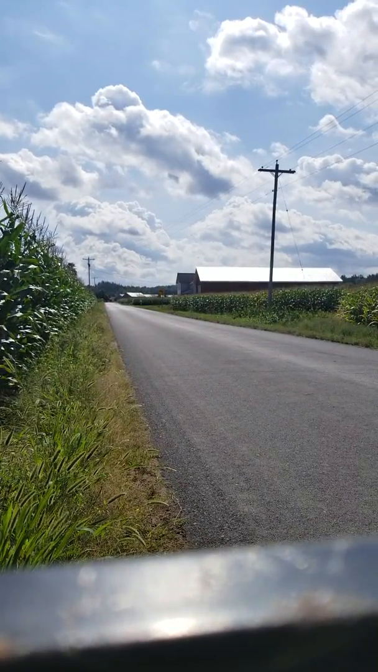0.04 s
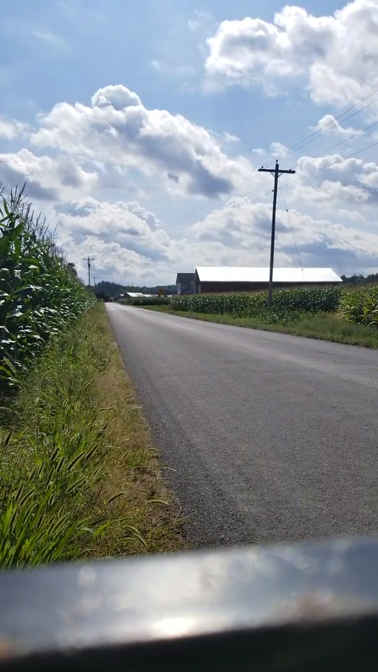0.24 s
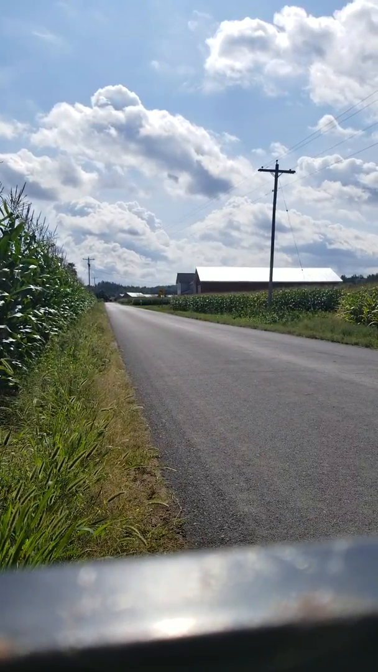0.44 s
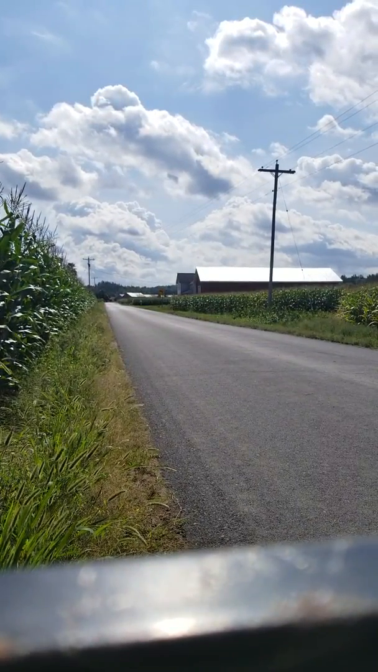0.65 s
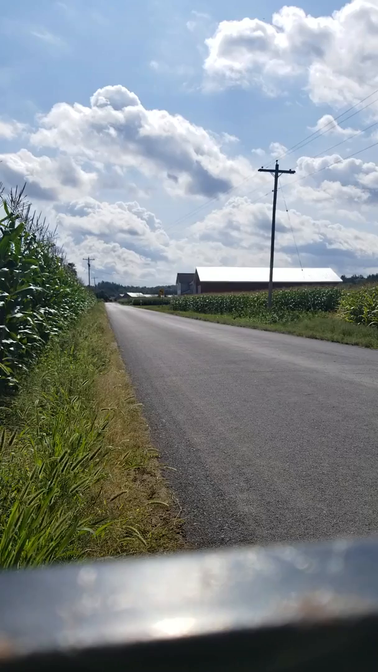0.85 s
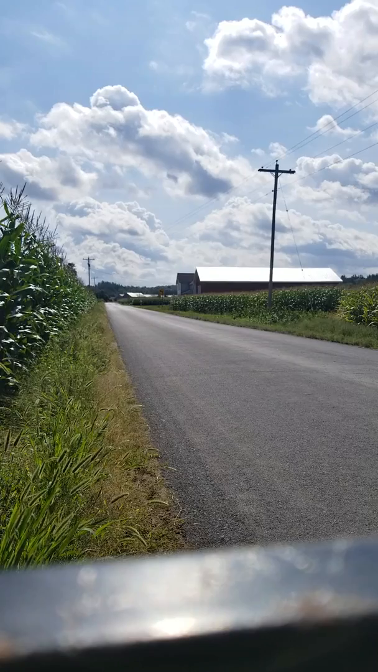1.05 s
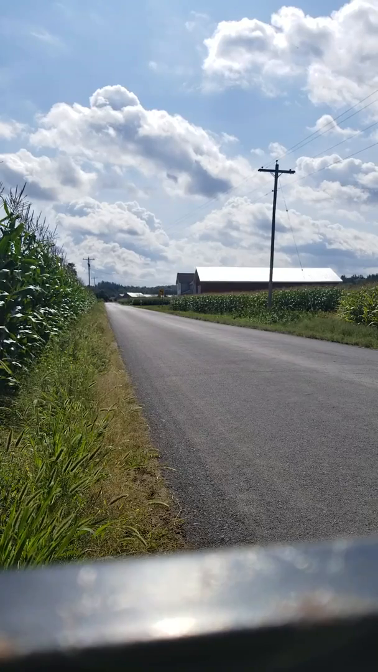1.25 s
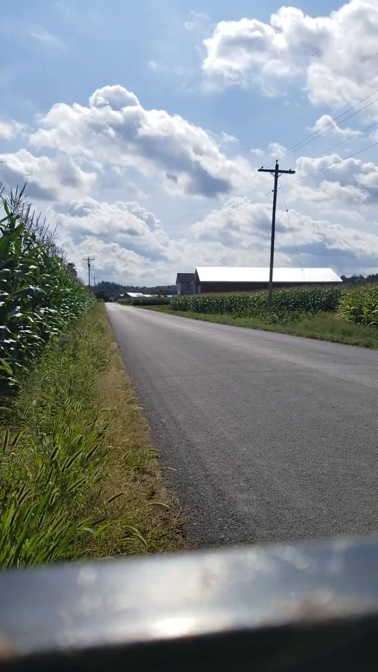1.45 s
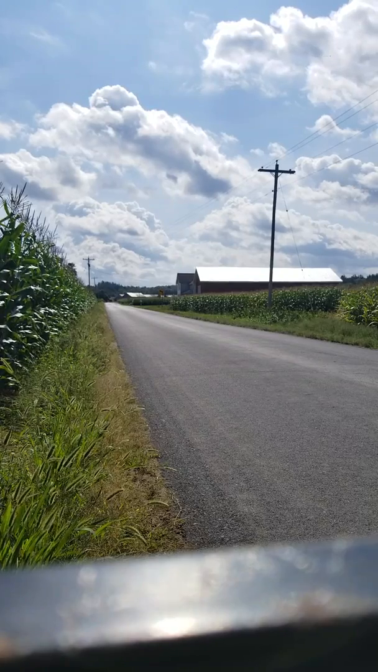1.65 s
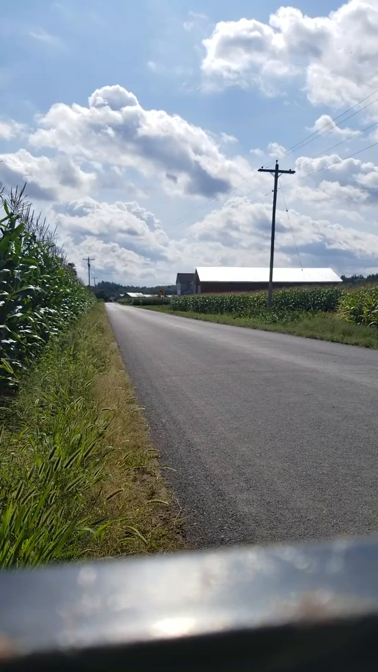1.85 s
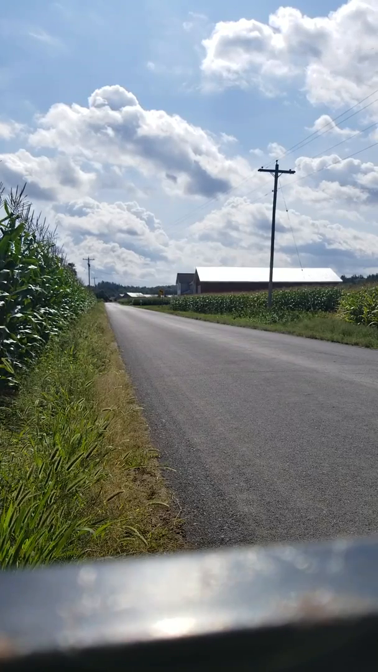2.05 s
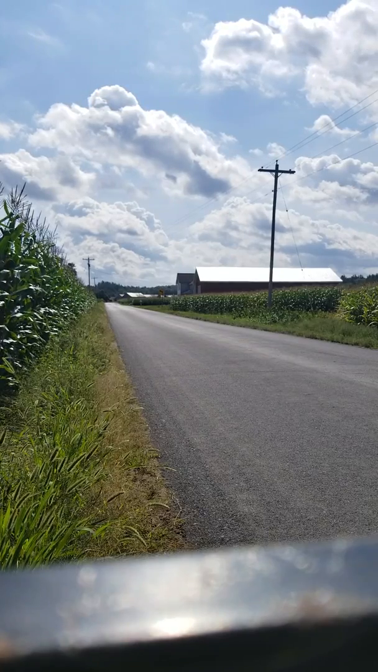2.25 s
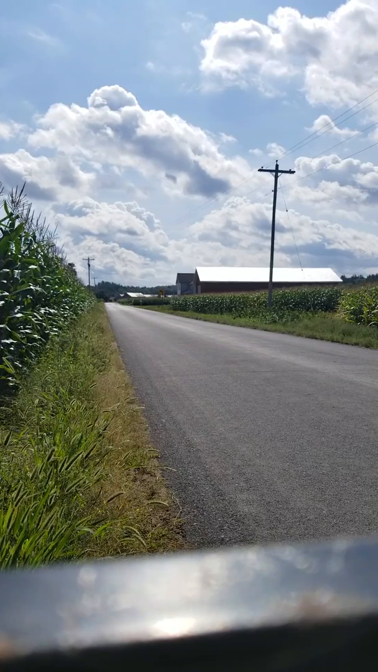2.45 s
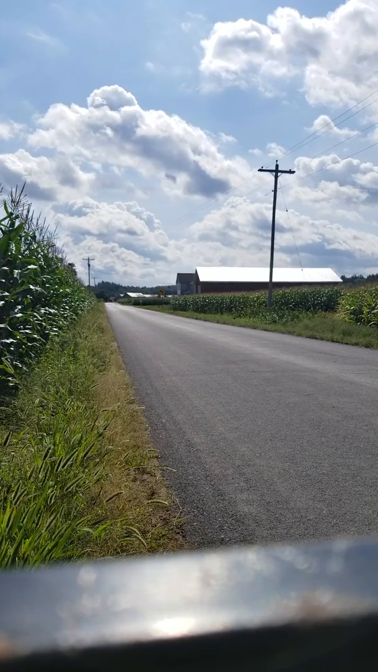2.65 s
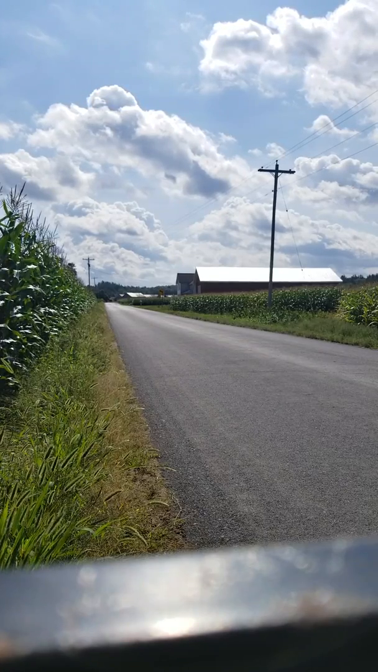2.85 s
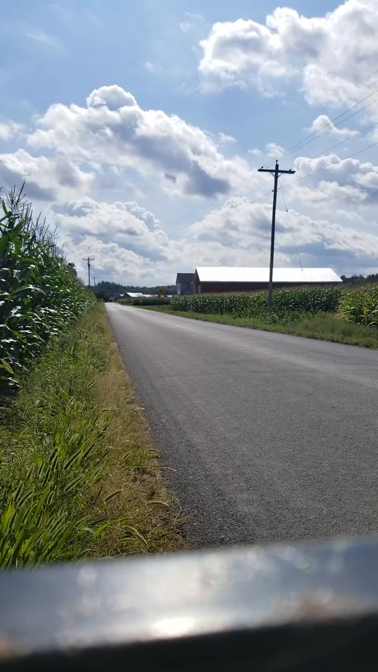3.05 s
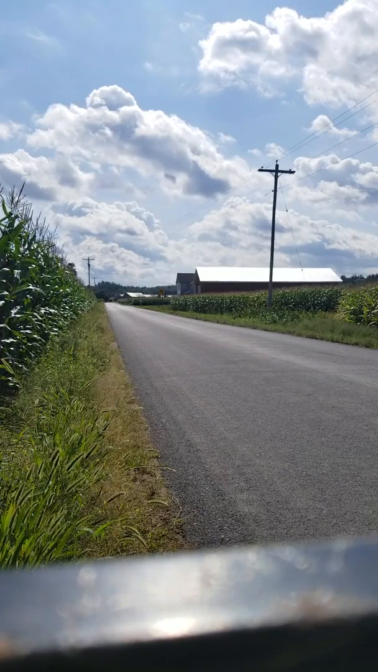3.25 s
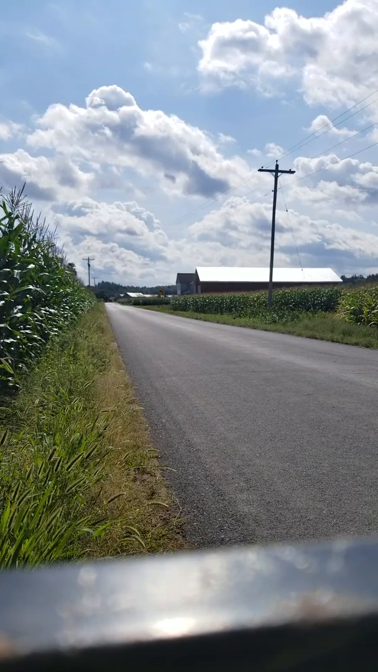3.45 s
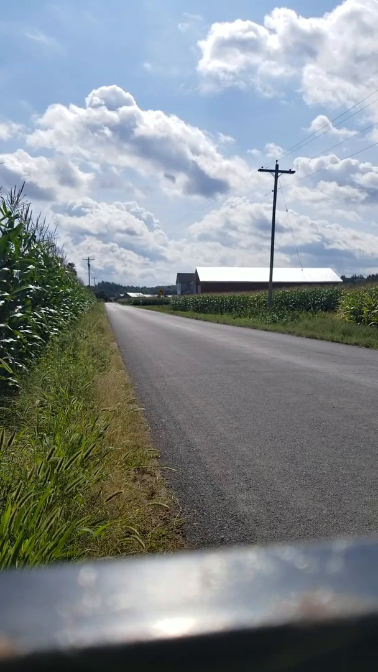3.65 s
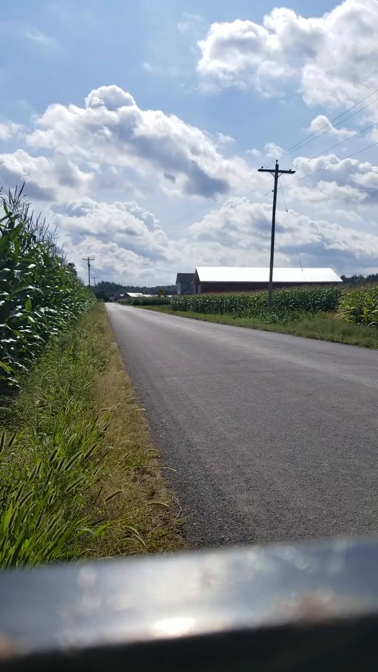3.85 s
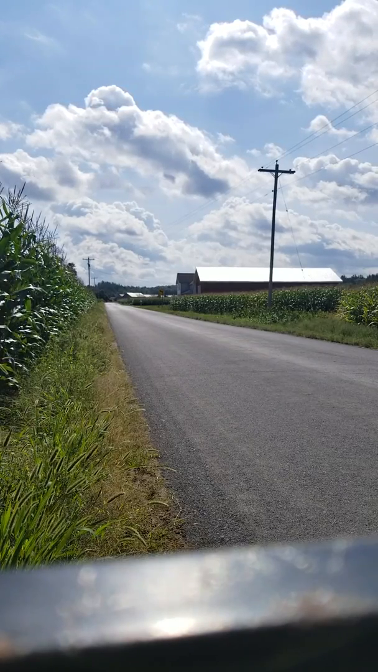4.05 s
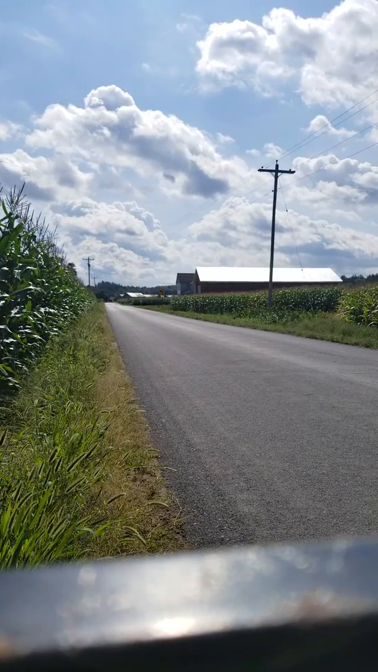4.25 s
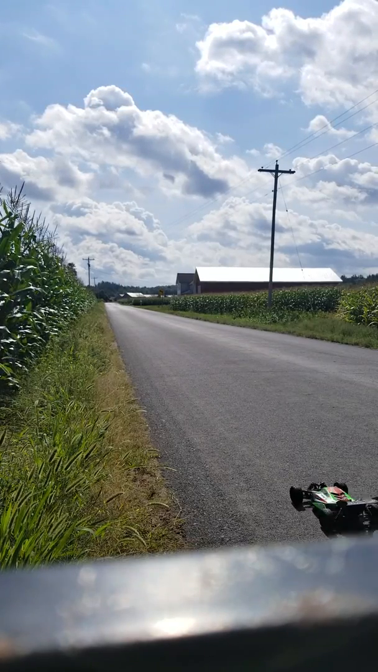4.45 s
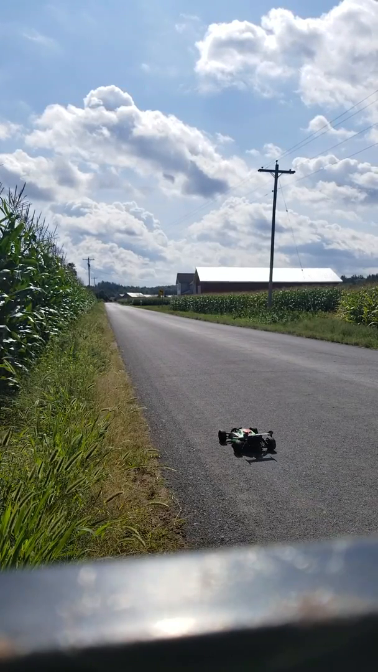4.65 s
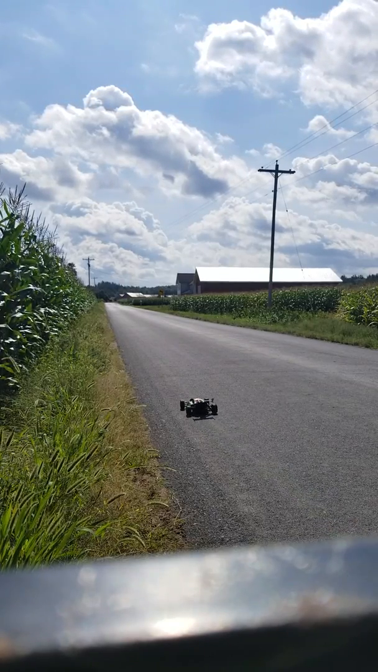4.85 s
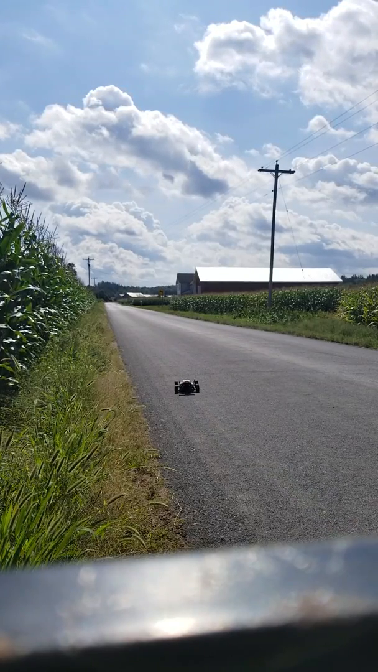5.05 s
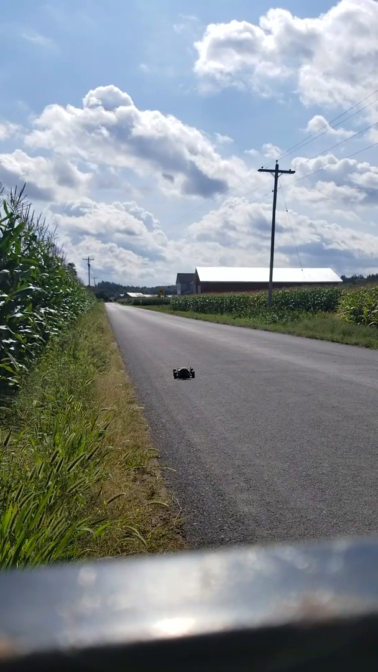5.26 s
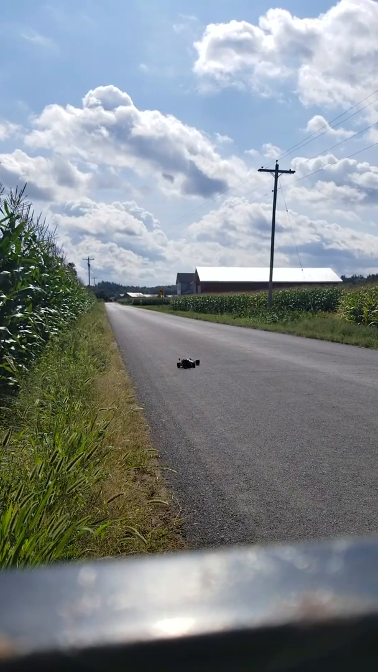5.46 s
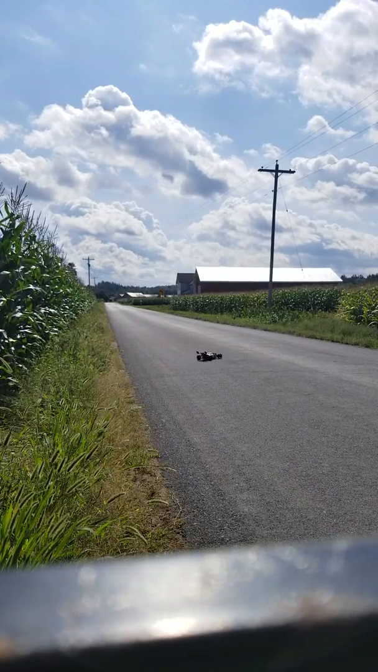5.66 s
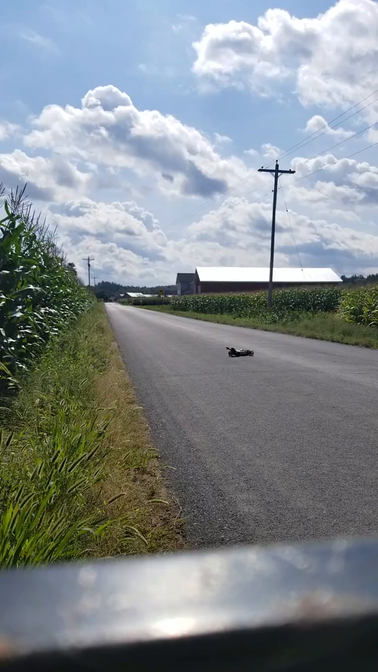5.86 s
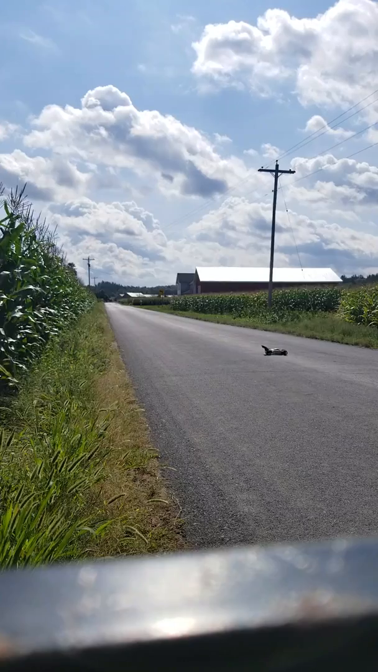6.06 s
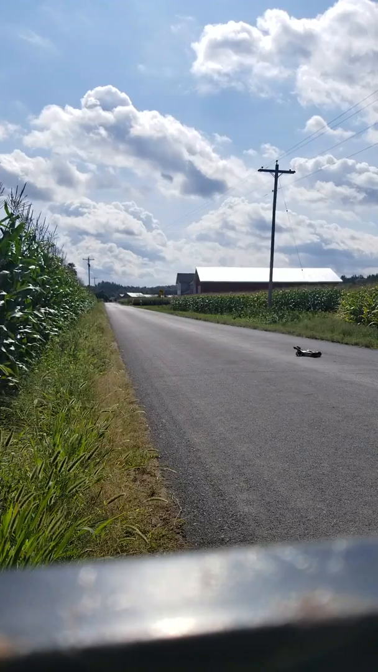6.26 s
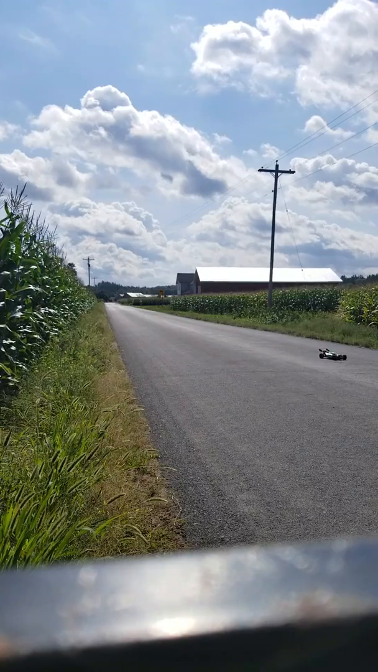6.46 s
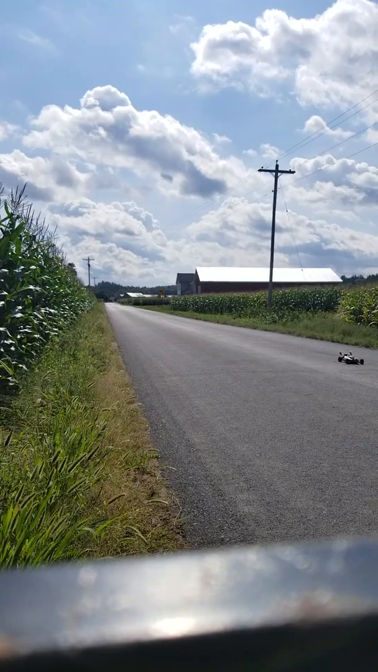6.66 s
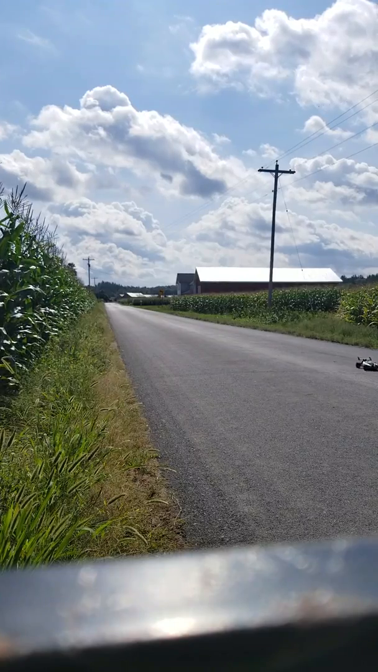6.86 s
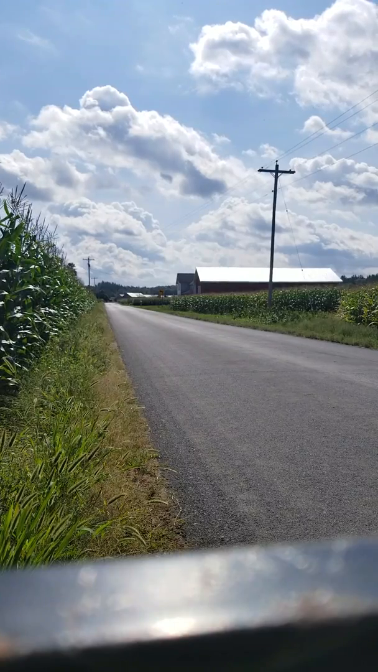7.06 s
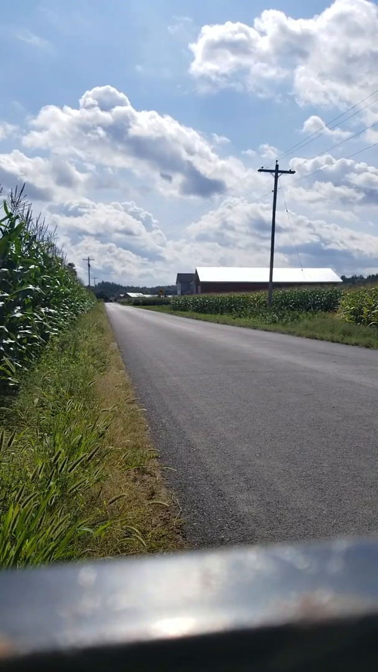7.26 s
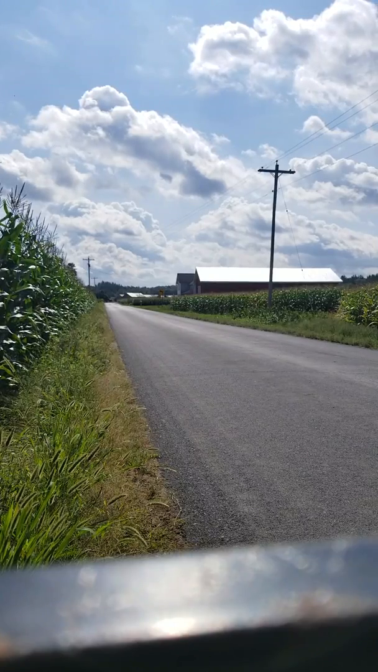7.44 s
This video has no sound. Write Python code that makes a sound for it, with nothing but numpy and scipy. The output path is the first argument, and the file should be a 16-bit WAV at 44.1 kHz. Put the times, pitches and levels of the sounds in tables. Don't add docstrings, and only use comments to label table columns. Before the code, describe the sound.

Camera fumbling over quiet maize field and insects, then a small electric model car clatters its gears, whines past, coasts and speeds up again.

```python
import sys
import numpy as np
from scipy import signal
from scipy.fft import rfft, irfft, next_fast_len
from scipy.io import wavfile
from scipy.ndimage import uniform_filter1d, map_coordinates

SR = 44100
rng = np.random.default_rng(int(sys.argv[2]) if len(sys.argv) > 2 else 0)


def materialize(psi):
    bounded = np.clip(np.atleast_2d(psi).T, -1, 1)
    quanta = np.round(bounded * 32767).astype(np.int16)
    wavfile.write(sys.argv[1], SR, quanta)


def makeup_ratio(level_db):
    decades = np.asarray(level_db, float) / 20
    return 10 ** decades


N = 330794
TIME = np.arange(N) / SR


def unit(x):
    return x / np.sqrt(np.mean(x ** 2) + 1e-20)


def along(points, hz):
    f, v = np.transpose(points)
    return np.interp(np.log(hz + 1), np.log(f + 1), v)


def curves(rows):
    s, *cols = np.transpose(rows)
    return [np.interp(TIME, s, c) for c in cols]


def wobble(rate):
    knots = rng.standard_normal(int(N * rate / SR) + 4)
    return map_coordinates(knots, [TIME * rate])


def bell(s, half_s):
    return np.exp(-((TIME - s) / half_s) ** 2)


def gate(start, end, fade):
    return np.clip(np.minimum(TIME - start, end - TIME) / fade, 0, 1)


def filtered(x, response):
    m = next_fast_len(N + 8192)
    return irfft(rfft(x, m) * response(np.fft.rfftfreq(m, 1 / SR)), m)[..., :N]


def coloured(x, colour):
    return unit(filtered(x, lambda hz: makeup_ratio(along(colour, hz))))


def patchy(depth_db, size=5):
    z = signal.stft(rng.standard_normal((2, N)), nperseg=512)[2]
    patches = uniform_filter1d(rng.standard_normal(z.shape[1:]), size, 0)
    patches = uniform_filter1d(patches, 12, 1)
    return unit(signal.istft(z * makeup_ratio(depth_db * unit(patches)), nperseg=512)[1][:, :N])


def spread(pair, alike, ports):
    turn = lambda hz: np.arccos(np.clip(along(alike, hz), -1, 1)) / 2
    mid, side = filtered(pair, lambda hz: np.array([np.cos(turn(hz)), np.sin(turn(hz))]))
    return filtered(np.array([mid + side, mid - side]), lambda hz: makeup_ratio(along(ports, hz) * [[.5], [-.5]]))


def sides(pan_db):
    return makeup_ratio(np.array([[pan_db / 2], [-pan_db / 2]]))


# (frequency [Hz], level [dB per Hz])
RUMBLE_COLOUR = [(21, -20.5), (35, -1.5), (86, 2), (146, -13.5), (308, -25), (369, -22.5), (425, -24.5),
                 (571, -28), (766, -38.5), (1000, -50), (1300, -65), (2200, -120)]
LEAF_COLOUR = [(2500, -10.5), (3800, -35.5), (5000, -4.5), (6800, -2.5), (7400, -24), (8000, -60)]
AIR_COLOUR = [(350, -52.5), (600, -17.5), (1460, -12.5), (1740, -16), (6470, -17), (7520, -21),
              (8740, -2.5), (10400, -19), (15700, -20)]
# (time [s], half length [s], extra level [dB])
RUMBLE_SWELLS = [(0.0, 0.27, 3), (1.2, .45, 3), (5.011, 0.036, 4), (5.23, 0.194, 7), (5.659, 0.047, 3)]
# (time [s], half length [s], level [dB])
LEAF_GUSTS = [
    (0.0, 0.262, -68.5),
    (0.428, 0.158, -77.5),
    (0.741, 0.056, -72.5),
    (1.399, 0.57, -73),
]
# (frequency [Hz], likeness [0-1])
FIELD_ALIKE = [(30, .55), (70, .62), (130, .9), (290, 0.34), (640, 0.15), (1400, 0.41), (3000, 0.16)]
# (frequency [Hz], left minus right [dB])
FIELD_BALANCE = [(30, 11), (80, -0.5), (200, 1), (400, -10), (700, -6), (1300, 11.5), (2400, 3.5),
                 (4400, -4.5), (15000, 4.5)]


def field():
    hum = makeup_ratio(-20 + 2.5 * wobble(7)) * np.sin(2 * np.pi * 75 * TIME + 0.22 * wobble(6))
    swells_db = sum(db * bell(s, half_s) for s, half_s, db in RUMBLE_SWELLS)
    rumble = coloured(patchy(depth_db=0.0), RUMBLE_COLOUR) + hum * [[1], [.5]]
    rumble = makeup_ratio(-58.5 + swells_db) * rumble
    gusts = sum(makeup_ratio(db) * bell(s, half_s) for s, half_s, db in LEAF_GUSTS)
    leaves = gusts * coloured(patchy(depth_db=2), LEAF_COLOUR)
    air = makeup_ratio(-70.0) * coloured(patchy(depth_db=0.9), AIR_COLOUR)
    tone_db = -85 + 1.2 * wobble(6) + 6 * (bell(2.42, .09) + bell(2.78, .08))
    tone = makeup_ratio(tone_db) * np.sin(2 * np.pi * 1475 * TIME + .5 * wobble(20))
    left, right = spread(rumble + leaves + air + tone, FIELD_ALIKE, FIELD_BALANCE)
    return np.array([left, np.roll(right, 11)])


# (pitch [Hz], width [Hz], trills [per s], start [cycles], level [dB])
CRICKETS = [
    (8700, 130, 52, .2, -81.5),
    (8500, 340, 17.55, 0.45, -78.5),
    (8840, 270, 17.65, 0.23, -71.5),
    (9000, 210, 17.0, 0.6, -79),
    (9430, 170, 16.95, 0.24, -72),
]


def crickets():
    out = np.zeros((2, N))
    for hz, width_hz, rate, start, db in CRICKETS:
        rasp = unit(filtered(rng.standard_normal((2, N)), lambda f: 1 / (1 + ((f - hz) / width_hz) ** 4)))
        cycles = rate * TIME - start + 0.0077 * wobble(3.8)
        stroke = np.exp(2 * np.cos(2 * np.pi * cycles))
        out += makeup_ratio(db + 1.2 * wobble(2)) * unit(rasp * (stroke + 1.1))
    return out * makeup_ratio([[5], [-8]])


# (time [s], peak level [dB], pitch [Hz])
KNOCKS = [(0.955, -56.5, 297), (1.045, -51.5, 241), (1.083, -51.5, 353), (1.157, -38.5, 201),
          (1.198, -23.5, 457), (1.266, -33, 434), (1.296, -38, 479.5), (1.364, -35.5, 673),
          (1.425, -39, 334.7), (1.493, -46.5, 231), (1.533, -46, 235), (1.609, -48, 444),
          (1.641, -48.5, 364), (2.293, -53.5, 329), (2.333, -41, 207), (2.383, -43, 310), (2.683, -51, 345)]


def knocks():
    out, t = np.zeros((2, N)), TIME[:SR // 5]
    soft = (1 - np.exp(-t / 0.001403)) ** 2
    for s, db, hz in KNOCKS:
        ring = np.sin(2 * np.pi * hz * t)
        ring += 0.5 * np.sin(2 * np.pi * hz * rng.uniform(0.962, 1.573) * t)
        ring += 0.73 * np.sin(2 * np.pi * hz * rng.uniform(0.436, 0.922) * t)
        fall = makeup_ratio(db + 1 - 60 * t / 0.0459)
        out[:, round(s * SR):][:, :len(t)] += fall * soft * ring * sides(-7.5)
    return out


# (time [s], peak level [dB], low edge [Hz], high edge [Hz], time to fall 60 dB [s])
RIGHT_TICKS = [(0.076, -25, 2990, 5420, 0.0077), (.382, -41.5, 2270, 3140, 0.0059),
               (0.4957, -34.5, 2167, 2783, 0.0098), (0.496, -41.5, 3170, 3553, 0.0116),
               (1.6422, -56.5, 2140, 6900, 0.14), (1.7412, -39.5, 4700, 6400, 0.022),
               (1.7412, -47, 11200, 13200, 0.021), (.0758, -38.5, 13000, 13200, 0.0062),
               (.0185, -54.5, 9700, 15000, .006), (0.054, -55.5, 9800, 12400, 0.0078),
               (.12, -59.5, 4700, 6800, 0.0078), (1.9, -58.5, 4000, 7000, .02),
               (0.44, -51.5, 4000, 6660, 0.0082), (2.01, -66.5, 585, 970, 0.059),
               (2.98, -40.5, 195, 906, 0.197)]
LEFT_TICKS = [(0.077, -53, 1890, 2170, 0.026), (1.204, -44, 1180, 13100, 0.049),
              (1.366, -44, 1570, 4030, 0.0753), (1.642, -49.5, 890, 1430, 0.07),
              (0.0754, -36.5, 8600, 10500, 0.0068), (1.7409, -41.5, 1490, 2660, 0.029),
              (2.28, -60.5, 2510, 7000, 0.295), (2.6828, -57.5, 510, 980, 0.18),
              (2.683, -58.5, 1000, 2760, 0.049), (3.5848, -42.5, 8000, 14000, .01),
              (3.6207, -32.5, 8540, 15500, 0.0066)]


def ticks():
    out, t = np.zeros((2, N)), TIME[:SR // 5]
    events = [(*row, -9) for row in RIGHT_TICKS] + [(*row, 8) for row in LEFT_TICKS]
    for s, db, low_hz, high_hz, t60, pan_db in events:
        fall = makeup_ratio(-60 * t / t60) + makeup_ratio(-32 - 60 * t / .15)
        shared, own = rng.standard_normal(len(t)), rng.standard_normal((2, len(t)))
        band = signal.butter(3, [low_hz, high_hz], "band", fs=SR, output="sos")
        snap = signal.sosfilt(band, fall * (shared + .4 * own))
        out[:, round(s * SR):][:, :len(t)] += makeup_ratio(db) * snap / abs(snap).max() * sides(pan_db)
    return out


# (pitch [Hz], level [dB], time to fall 60 dB [s])
LID = [(331, -15.5, 0.109), (792, -4, 0.0443), (1256, 2, 0.0233), (1867, -5.5, 0.028), (4034, -24, 0.056),
       (5830, -16.5, 0.041)]


def lid_snap():
    out, t = np.zeros((2, N)), TIME[:SR // 5]
    lid = sum(makeup_ratio(db - 60 * t / t60) * np.sin(2 * np.pi * hz * t) for hz, db, t60 in LID)
    out[:, round(1.7415 * SR):][:, :len(t)] += makeup_ratio(-38.5) * lid * sides(3.6)
    return out


# (time [s], half length [s], level [dB])
FUMBLES = [
    (1.304, 0.221, -62),
    (2.383, 0.092, -65),
    (2.78, 0.063, -87),
]
# (frequency [Hz], level [dB per Hz])
SKIN_COLOUR = [(150, -11.5), (300, 3.5), (650, -4), (1250, -28), (2500, -120)]


def fumbles():
    skin = coloured(patchy(depth_db=5.5), SKIN_COLOUR)
    strength = sum(makeup_ratio(db) * bell(s, half_s) for s, half_s, db in FUMBLES)
    return strength * (skin[0] + 0.393 * skin) * sides(-13.5)


def handling():
    return knocks() + ticks() + lid_snap() + fumbles()


# (pitch [Hz], level [dB])
SERVO_TONES = [(1970, -80), (2950, -76), (3924, -84), (6885, -77), (8764, -78), (11811, -85), (12785, -86)]
# (start [s], end [s])
SERVO_TWITCH = (2.272, 2.318)
# (start [s], end [s], pitch [Hz], glide [Hz per s],
# level [dB])
WHISTLES = [
    (3.537, 3.753, 5930, 0, -66),
    (3.542, 3.64, 12150, 0, -76),
    (4.835, 4.87, 2850, 0, -49),
    (4.885, 5.0, 2860, -600, -47),
    (5.38, 5.582, 3340, -400, -57),
    (6.15, 6.45, 13000, 0, -76),
]


def servo():
    buzz = gate(*SERVO_TWITCH, 0.0039) * sum(makeup_ratio(db) * np.sin(2 * np.pi * hz * TIME) for hz, db in SERVO_TONES)
    for start, end, hz, glide, db in WHISTLES:
        age = TIME - start
        cycles = (hz + glide * age / 2) * age
        strength = gate(start, end, .015) * makeup_ratio(db + 2 * wobble(50))
        buzz += strength * np.sin(2 * np.pi * cycles + .4 * wobble(40))
    return np.sqrt(2) * buzz


# (time [s], peak level [dB], bounce delay [s], bounce level [dB])
GEAR_SLAMS = [(3.0927, -26, 0.01606, -1.5), (3.1291, -20, 0.0271, -1), (3.1825, -21.5, 0.0168, -3.5),
              (3.2349, -20, 0.0093, -3), (3.2741, -20, 0.01106, -2.5), (3.301, -25, .006, -4.5),
              (3.3305, -21, 0.0171, -3.5), (3.3736, -21.5, 0.012, -6), (3.4141, -22.5, 0.01685, -4.5),
              (3.454, -21.5, 0.0117, -3), (3.492, -22, 0.0138, -3)]
# (time [s], peak level [dB])
LONE_SLAMS = [
    (2.9678, -34.5),
    (2.98, -26),
    (3.0224, -42),
    (4.812, -32),
    (4.8216, -26.5),
]
# (frequency [Hz], level [dB per Hz])
SLAM_COLOUR = [(88, -34), (150, -11), (274, -11.5), (360, -6), (658, -14), (769, -6), (1300, -2),
               (1680, -9.5), (2330, -14.5), (3250, 0), (4180, -7.5), (6680, -3), (7650, -20.5),
               (10900, -12.5), (15700, -15)]


def stutter():
    envelope = np.zeros(N)
    slams = [(s, db) for s, db, _, _ in GEAR_SLAMS]
    rebounds = [(s + after_s, db + less_db) for s, db, after_s, less_db in GEAR_SLAMS]
    for s, db in slams + rebounds + LONE_SLAMS:
        age = np.clip(TIME - s, 0, 1)
        clack = 1 + 1.4 * makeup_ratio(-60 * age / .012)
        fall = makeup_ratio(db - 13.5 - 60 * np.clip(age - 0.00369, 0, 1) / 0.0709)
        envelope += clack * fall * (1 - np.exp(-age / .0004))
    rattle = coloured(patchy(depth_db=3.0) * makeup_ratio(2.03 * wobble(700)), SLAM_COLOUR)
    shell = uniform_filter1d(envelope, 1300, origin=649)
    dull = lambda hz: makeup_ratio(along(SLAM_COLOUR, hz) - 8.4 * np.log2(1 + hz / 1000))
    boom = unit(filtered(rng.standard_normal((2, N)), dull))
    return envelope * rattle + makeup_ratio(-8) * shell * boom


# (time [s], place [0-4])
PLACES = [(3.8, 0), (4.2, 1), (4.76, 1), (4.8, 2), (5.4, 2), (5.9, 3), (6.45, 3), (6.9, 4)]
# (frequency [Hz], level [dB per Hz])
COLOURS = [
    [(120, -21.5), (200, -20.5), (393, -12), (526, -26), (718, -5.5), (1030, -8), (2190, -14.5),
     (5860, -19), (8000, -32), (12000, -22.5), (15700, -35.5)],
    [(120, -35), (365, -23), (508, -27.5), (759, -11), (1180, -21.5), (1660, -15.5), (2070, -24),
     (3390, -11.5), (6540, -16.5), (7710, -31.5), (11300, -23.5), (15700, -36)],
    [(120, -47.5), (200, -18.5), (489, -17), (644, -6.5), (846, -14), (1660, -0.5), (2820, 0.5),
     (4000, -0.5), (6190, 0), (7850, -16.5), (10500, -12), (15700, -14.5)],
    [(120, -53.5), (200, -28), (359, -20.5), (415, -44.5), (577, -8), (1070, -9), (1730, -5.5), (3270, 9.5),
     (6310, 6.5), (7570, -1.5), (12400, 0.5), (15700, -7.5)],
    [(120, -54.5), (200, -29), (365, -20.5), (498, -26.5), (587, -11), (2150, -6.5), (3580, -0.5),
     (4460, -7), (6310, -4), (8000, -11), (9780, -6), (15700, -15.5)],
]
# (delay [ms], strength [0-1])
ROAD_ECHO = [(.3, 0.014), (.45, 0.0275), (.565, 0.018), (0.578, 0.1), (0.598, 0.018)]
# (frequency [Hz], half width [Hz])
SHADOWS = [
    [],
    [],
    [(2200, 170), (3560, 90), (5400, 200)],
    [(1980, 130), (3450, 110), (5250, 220)],
    [(1980, 110), (5350, 180), (7050, 200)],
]
# (gear level over chassis [dB], tyre hiss level over chassis [dB])
ASPECT = [(-2, -10.5), (1, -7), (2, -5), (4.5, -6), (2, -6.5)]
EDGES_HZ = [0, 2000, 7800, 22050]
# (start [s], full [s], end [s])
TURNED_AWAY = (4.3, 4.54, 4.77)


def teeth_and_tyres(shaft_hz, turns, level):
    octaves = np.log2(shaft_hz / 105.7)
    start, full, end = TURNED_AWAY
    stand_out_db = 2.5 * np.interp(TIME, [start, full], [0, 1]) * (TIME < end)
    teeth = 16
    tooth = np.floor(turns * teeth).astype(int)
    strikes = np.diff(tooth, prepend=0) * rng.standard_normal(teeth)[tooth % teeth]
    strikes = strikes / np.sqrt(shaft_hz * teeth / SR)
    source = patchy(depth_db=1.5, size=2) * makeup_ratio(0.99 * np.cos(2 * np.pi * turns))
    source = source + makeup_ratio(-15) * strikes * [[1], [0]]
    place, = curves(PLACES)
    noise = np.zeros((2, N))
    settings = zip(COLOURS, ROAD_ECHO, SHADOWS, ASPECT)
    for k, (colour, (delay_ms, echo), shadows, (gear_db, hiss_db)) in enumerate(settings):
        mid_db = gear_db + 3 * octaves + stand_out_db
        high_db = hiss_db + 6 * octaves + stand_out_db
        share = np.clip(1 - abs(place - k), 0, 1)
        dips_db = lambda hz: sum(-12 / (1 + ((hz - centre) / width) ** 2) for centre, width in shadows)
        bounce = lambda hz: 1 - echo * np.exp(-2j * np.pi * hz * delay_ms / 1000)
        path = lambda hz: makeup_ratio(along(colour, hz) + dips_db(hz)) * bounce(hz)
        for lo, hi, db in zip(EDGES_HZ, EDGES_HZ[1:], (level - 2.5, level + mid_db, level + high_db)):
            band = unit(filtered(source, lambda hz: path(hz) * (hz >= lo) * (hz < hi)))
            noise += share * makeup_ratio(db - 1.1976) * band
    return noise


def swell_db(start, full, end, db):
    rising = np.interp(TIME, [start, max(full, start + .01)], [-30, db])
    return np.maximum(rising - 220 * np.clip(TIME - end, 0, None), -30)


# (multiple of shaft speed, start [s], full [s], end [s], level over chassis [dB])
WHINES = [(6, 4.2, 4.34, 4.46, -7), (6, 4.29, 4.34, 4.76, -13), (8, 4.2, 4.42, 4.76, -8),
          (14, 4.05, 4.25, 4.33, -10), (21, 4.0, 4.2, 4.32, -5), (6, 6.9, 7.2, 7.5, -7),
          (7, 3.8, 4, 4.1, -6), (7, 3.95, 4.13, 4.29, 0), (7, 4.35, 4.64, 4.76, -7),
          (7, 5.3, 5.62, 5.85, -8), (7, 5.3, 5.62, 6.15, -12), (22, 5, 5.25, 5.5, 3),
          (22, 5.7, 5.88, 5.97, 3), (22, 4.5, 4.68, 4.76, 3), (7, 6.6, 6.8, 7.5, -7),
          (8, 3.8, 4.2, 4.76, -11), (8, 6.8, 7.45, 7.5, -13), (9, 3.8, 4.1, 4.42, -10),
          (12, 3.6, 4.15, 4.34, -12), (13, 6.8, 7.15, 7.5, -14), (14, 3.3, 3.95, 4.4, -15),
          (16, 3.3, 3.84, 3.88, 1), (16, 3.6, 3.95, 4.2, -5), (16, 5.2, 6.05, 6.45, -6),
          (16, 6.46, 6.5, 6.62, 4), (16, 6.46, 6.5, 6.88, -3), (32, 3.9, 4.12, 4.2, 2),
          (32, 6.9, 7.25, 7.5, 3), (40, 7, 7.3, 7.5, 3), (20, 6.8, 7.12, 7.26, 1), (24, 6.9, 7.2, 7.5, 7),
          (28, 6.6, 6.9, 7.1, 5)]
# (time [s], share [0-1])
SLACK = [(3.55, .85), (3.9, .6), (4.1, .45), (4.76, .45), (4.8, .95), (6.45, .95), (6.55, .75), (7, .6)]
# (frequency [Hz], level [dB])
CHASSIS = [(200, 8.5), (500, -4.5), (620, -0.5), (760, 1.5), (1000, -1.5), (1300, 0.5), (1750, -2),
           (2100, -6.5), (3500, -10)]


def gear_whine(shaft_hz, turns, level):
    whine = np.zeros(N)
    slack, = curves(SLACK)
    for order in sorted({row[0] for row in WHINES}):
        stage_db = np.max([swell_db(*row[1:]) for row in WHINES if row[0] == order], axis=0)
        rough = slack * min(order / 16, 1) ** 1.4
        rate = 10 * min(order, 16)
        swing = np.sqrt(1 - rough) + np.sqrt(rough / 2) * (wobble(rate) + 1j * wobble(rate))
        swing = swing * (1 + 0.112 * np.cos(2 * np.pi * turns / 2.25 + order))
        level_db = level + stage_db + along(CHASSIS, order * shaft_hz) + 0.38 * wobble(13)
        whine += np.sqrt(2) * makeup_ratio(level_db) * np.imag(swing * np.exp(2j * np.pi * order * turns))
    return whine


# (time [s], turns [per s])
SHAFT_SPEED = [(3.54, 14), (3.65, 26), (3.75, 44), (3.9, 76), (4, 91), (4.2, 112), (4.4, 126), (4.76, 142),
               (5.6, 104), (5.75, 96), (6.05, 75), (6.46, 62), (6.75, 95), (7, 121.5), (7.1, 136),
               (7.2, 148), (7.3, 155), (7.5, 163)]
# (time [s], chassis level [dB])
LOUDNESS = [(3.53, -54), (3.56, -46), (3.818, -34), (3.856, -33), (3.88, -35.5), (4.014, -35),
            (4.182, -31.5), (4.544, -38.5), (4.765, -41), (4.785, -48.5), (4.9, -45), (5.3, -48.5),
            (6.107, -53), (6.47, -52.5), (6.53, -50.5), (6.93, -44.5), (7.142, -41.5), (7.46, -42)]
# (time [s], half length [s], share [0-1], above [Hz])
TREBLE_DIP = (6.68, 0.21, 0.73, 11600)


def drive():
    shaft_hz, = curves(SHAFT_SPEED)
    turns = np.cumsum(shaft_hz) / SR
    level, = curves(LOUDNESS)
    sound = teeth_and_tyres(shaft_hz, turns, level) + gear_whine(shaft_hz, turns, level) * [[1], [0]]
    s, half_s, share, above_hz = TREBLE_DIP
    finest = filtered(sound, lambda hz: 1 / (1 + (above_hz / (hz + 1)) ** 12))
    sound = sound - share * bell(s, half_s) * finest
    running = np.clip((TIME - 3.5) / 0.0235, 0, 1)
    return running * sound * makeup_ratio(0.227 * wobble(30))


# (frequency [Hz], likeness [0-1])
CAR_ALIKE = [(300, .95), (1000, .92), (2500, .72), (5000, .62), (9000, .55), (14000, .42)]
# (frequency [Hz], left minus right [dB])
CAR_BALANCE = [(100, -4.5), (200, 1), (380, -7.5), (700, 3), (1290, 5.5), (2400, 10), (4400, 6), (6000, -6),
               (7800, 1.5), (9500, 17), (15000, 8)]
# (time [s], left ahead of right [samples])
LEAD = [(3.0, -1.5), (3.5, 2), (3.9, 0.5), (4.3, 6.5), (4.7, 4.5), (5.2, 11), (6, 7.5), (6.8, 9),
        (7.5, 7.5)]


def car():
    sound = drive() + stutter() + servo() * [[1], [0]]
    left, right = spread(sound, CAR_ALIKE, CAR_BALANCE)
    lead, = curves(LEAD)
    index = np.arange(N)
    left = map_coordinates(left, [index + lead / 2], order=5)
    right = map_coordinates(right, [index - lead / 2], order=5)
    return np.array([left, right])


def scene():
    return field() + crickets() + handling() + car()


def band_limit(x):
    return signal.sosfilt(signal.butter(12, 15870, fs=SR, output="sos"), x)


def record(dry):
    band = filtered(dry, lambda hz: (hz < 15850) / (1 + (31 / (hz + 1)) ** 6))
    return band_limit(band)


dry = scene()
out = record(dry)
materialize(out)
```